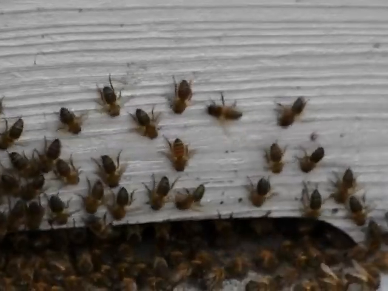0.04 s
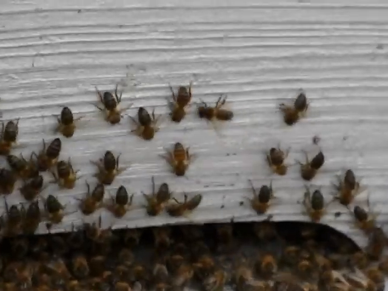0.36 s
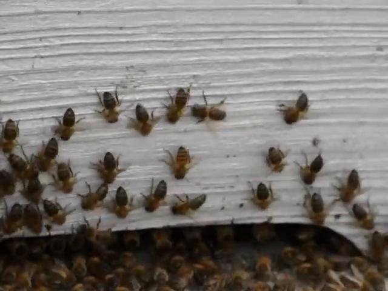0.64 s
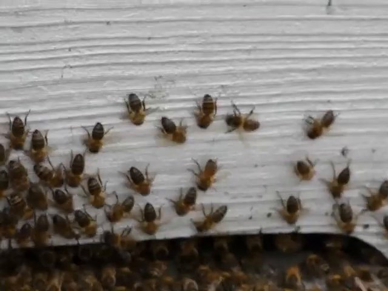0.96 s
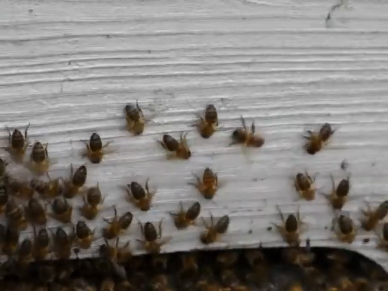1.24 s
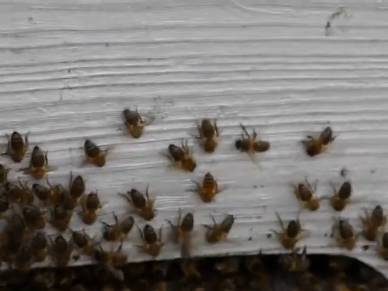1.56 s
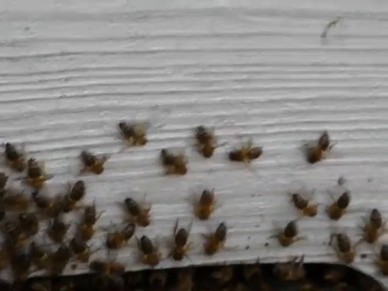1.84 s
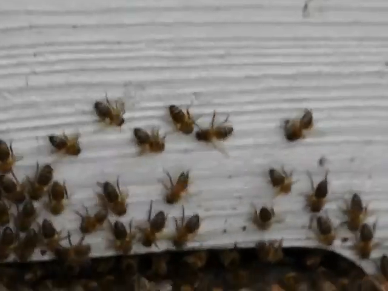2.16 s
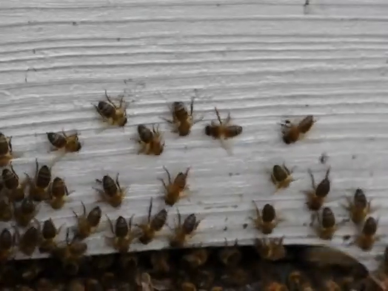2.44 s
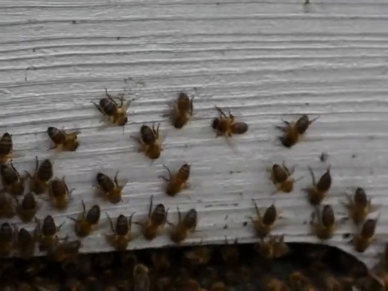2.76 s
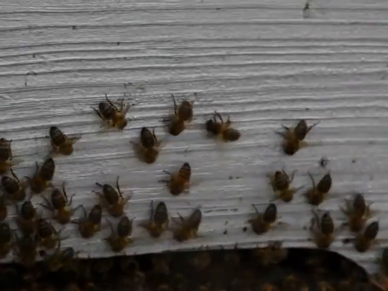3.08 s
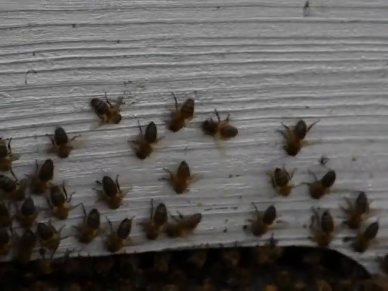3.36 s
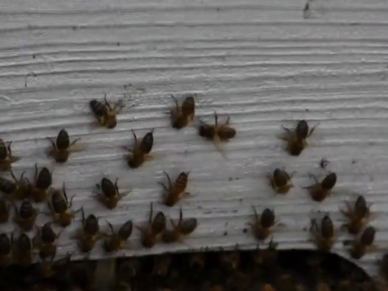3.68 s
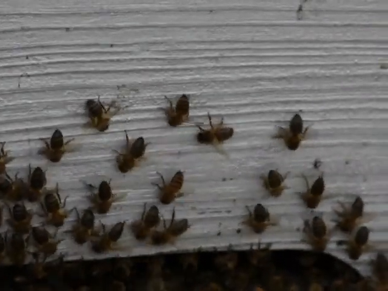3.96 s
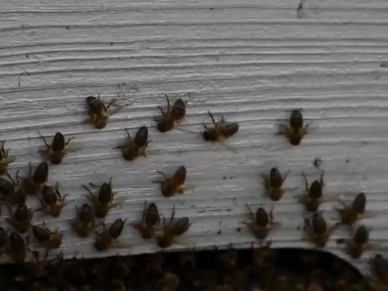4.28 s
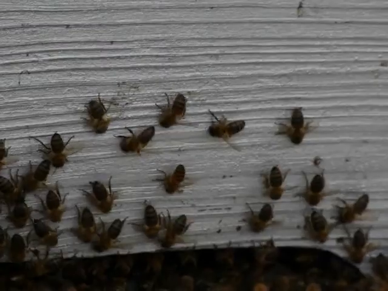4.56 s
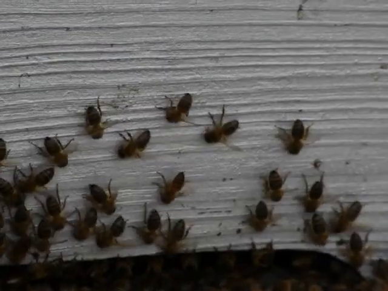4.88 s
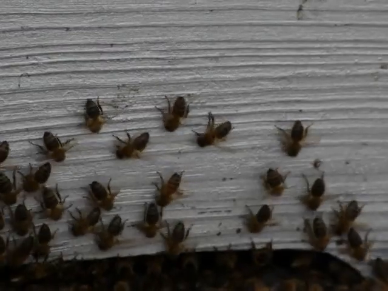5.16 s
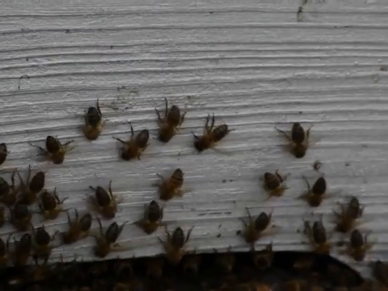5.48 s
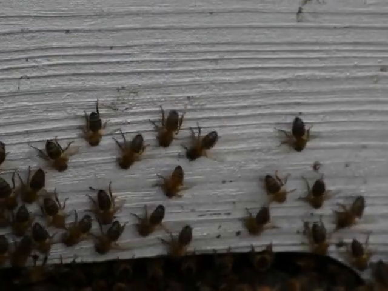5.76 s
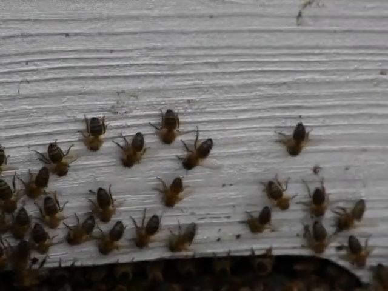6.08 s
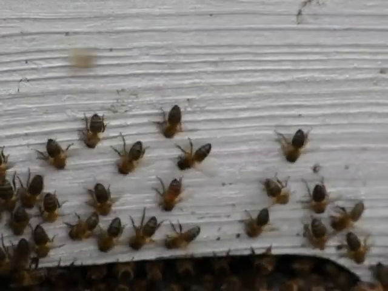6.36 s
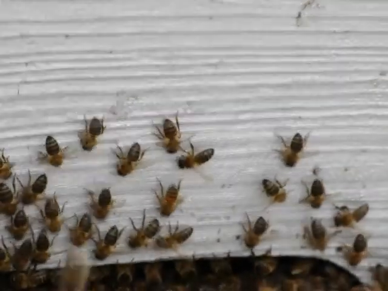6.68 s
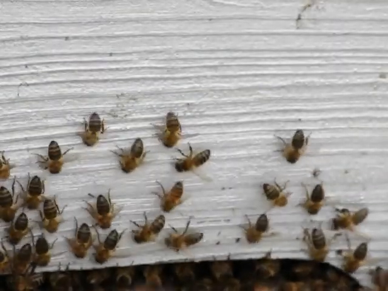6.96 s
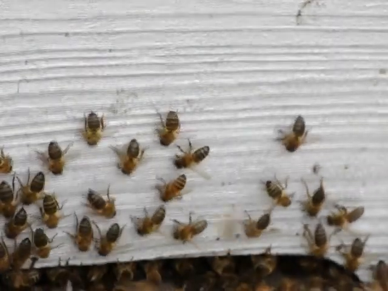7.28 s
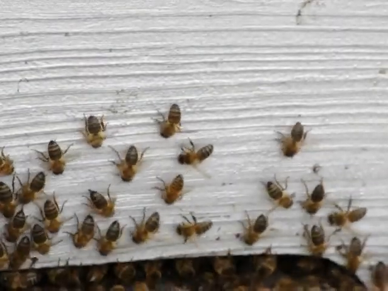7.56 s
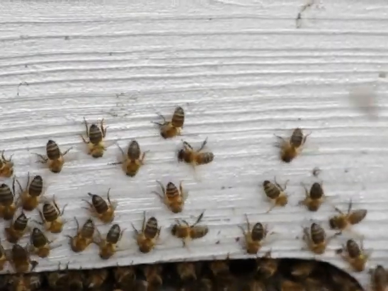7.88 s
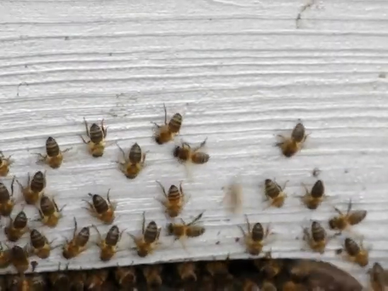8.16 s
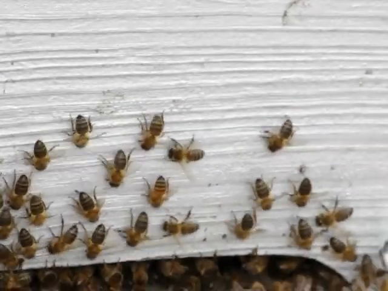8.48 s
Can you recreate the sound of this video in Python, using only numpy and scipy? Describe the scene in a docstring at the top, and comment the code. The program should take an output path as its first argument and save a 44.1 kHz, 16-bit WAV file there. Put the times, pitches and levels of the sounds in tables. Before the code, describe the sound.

Gusts thump and rumble on the microphone beside a beehive, then ease, leaving softly rustling leaves and a faraway whistling bird.

```python
"""Gusts buffet the microphone with low, fluttering thumps, outdoors at the entrance of a beehive.
Behind them a breeze swells in nearby leaves and dies away over the soft rush of wind in far trees.
A distant bird repeats a two-voiced rising whistle about every two seconds.
The wings of the colony hum very faintly inside the box."""
import sys
import numpy as np
from scipy import signal
from scipy.fft import rfft, irfft
from scipy.io import wavfile

SR = 44100
rng = np.random.default_rng(int(sys.argv[2]) if len(sys.argv) > 2 else 0)


def dump(signal):
    """Clip the signal to [-1, 1] and save it as 16-bit WAV at the path in sys.argv[1]."""
    limited = np.clip(np.atleast_2d(signal).T, -1, 1)
    pcm = np.round(limited * 32767).astype(np.int16)
    wavfile.write(sys.argv[1], SR, pcm)


N = 380583


def from_db(db):
    """Decibels to gain."""
    return 10 ** (np.asarray(db) / 20)


def rms_one(x):
    """Scale to unit rms."""
    return x / np.sqrt(np.mean(x ** 2) + 1e-20)


def in_time(rows):
    """The columns of a curve table, at every sample."""
    times, *columns = np.transpose(rows)
    return [np.interp(np.arange(N) / SR, times, column) for column in columns]


def drift(rate_hz):
    """Smooth random wandering, mostly slower than rate_hz; rms 1."""
    hz = np.arange(N // 2 + 1) * SR / N
    return rms_one(irfft(rfft(rng.standard_normal(N)) / (1 + (hz / rate_hz) ** 2), N))


def coloured(x, colour):
    """Filter a sound by a table of frequency_hz, gain_db; rms 1."""
    hz = np.maximum(np.arange(N // 2 + 1) * SR / N, 1)
    points_hz, db = np.transpose(colour)
    gain = from_db(np.interp(np.log(hz), np.log(points_hz), db))
    return rms_one(irfft(rfft(x) * gain, N))


def band(x, kind, edges_hz, order):
    """A Butterworth filter."""
    return signal.sosfilt(signal.butter(order, edges_hz, kind, fs=SR, output="sos"), x)


def add(out, sound, start_s):
    """Mix a short sound in at a given time."""
    at = round(start_s * SR) + np.arange(len(sound))
    inside = (at >= 0) & (at < N)
    out[at[inside]] += sound[inside]


def hive(wingbeat_hz=172.4, level_db=-78, waver=0.01165, swell_db=3):
    """A faint, wavering hum of wings from inside the box."""
    pitch_hz = wingbeat_hz * (1 + waver * drift(2.47))
    hum = np.sin(2 * np.pi * np.cumsum(pitch_hz) / SR)
    return from_db(level_db) * rms_one(hum * from_db(swell_db * drift(1.8)))


def distant_rush(rush_db, gain_db=5.0):
    """Wind in far trees, smooth and dulled by distance."""
    # spectrum of the far trees: frequency_hz, gain_db
    rush_colour = [(25, -24), (50, -27), (90, -8.5), (130, -7.5), (200, 0), (300, 2.5), (470, 1), (700, 0),
                   (1000, -1.5), (1500, -5), (2200, -6.5), (3200, -9.5), (6000, -16.5), (15000, -25.5)]
    return from_db(rush_db + gain_db) * coloured(rng.standard_normal(N), rush_colour)


def leaves(leaf_db, peak_touches_per_s=14000, spread_db=0.5, gain_db=5.0):
    """Thousands of tiny leaf contacts a second blur into a hiss; more touch as the breeze rises."""
    # spectrum of the nearby leaves: frequency_hz, gain_db
    leaf_colour = [(500, -4), (1200, 5), (2200, 3.5), (3800, 4), (5300, 6.5), (6500, 4), (8200, 0.5),
                   (10500, -0.5), (12500, -0.5), (14400, 2.5), (16000, -1.5)]
    touches_per_s = peak_touches_per_s * from_db((leaf_db - leaf_db.max()) / 2)
    touching = rng.random(N) < touches_per_s / SR
    grains = touching * rng.standard_normal(N) * from_db(spread_db * rng.standard_normal(N))
    hiss = rms_one(grains) + 2 * rng.standard_normal(N)   # single leaves close by, a smooth mass behind
    return from_db(leaf_db + gain_db) * coloured(hiss, leaf_colour)


def whistle(voice, waver, flutter_db=2):
    """One side of the syrinx sings a rising note whose pitch and level tremble."""
    times, hz, db = np.transpose(voice)
    t = np.arange(int(0.6 * SR)) / SR
    pitch_hz = np.interp(t, times, hz) * (1 + waver * drift(160)[:len(t)])
    level = from_db(np.interp(t, times, db) + flutter_db * drift(30)[:len(t)])
    gate = np.clip(np.minimum(t - times[0], times[-1] - t) / 0.0064, 0, 1)
    return gate * level * np.sin(2 * np.pi * np.cumsum(pitch_hz) / SR)


def far_bird(direct_db=-1.5, echo_s=0.034, echo_db=-11.0, scatter_db=-4.0, scatter_t60_s=0.36):
    """Two overlapping upward sweeps, the upper one husky; an echo doubles them, foliage smears them."""
    # the calls: start_s, upper_voice_db, lower_voice_db, lower_voice_lag_s
    calls = [(-.305, -66, -61, 0.11), (1.832, -60, -57.5, 0.11), (3.985, -63, -56.5, 0.12),
             (6.15, -61.5, -55.5, .118), (8.273, -60.5, -57, 0.092)]
    # the two sides of the syrinx: time_in_note_s, pitch_hz, gain_db
    upper_voice = [(0, 3440, -3), (.04, 3820, 0.5), (.08, 4220, 0), (.125, 4720, 0), (.195, 5250, -3),
                   (.255, 5150, -12)]
    lower_voice = [(0, 2370, -9), (.05, 2517, -5), (.13, 2677, -3.5), (.23, 2900, 0.5), (.31, 3232, 1),
                   (.36, 3446, -0.5), (.405, 3730, -7.5)]
    song = np.zeros(N)
    for start_s, upper_db, lower_db, lag_s in calls:
        add(song, from_db(upper_db) * whistle(upper_voice, waver=0.0217), start_s)
        add(song, from_db(lower_db) * whistle(lower_voice, waver=0.0093), start_s + lag_s)
    t = np.arange(SR // 2) / SR
    foliage = rng.standard_normal(len(t)) * from_db(-60 * t / scatter_t60_s)
    scattered = signal.fftconvolve(song, foliage / np.linalg.norm(foliage))[:N]
    heard = from_db(direct_db) * song + from_db(scatter_db) * scattered
    add(heard, from_db(echo_db) * song, echo_s)
    return heard


def airflow(attack_s=0.0058, release_s=0.02, still_air_db=-79):
    """Each gust arrives quickly, slackens or builds as it blows, then drops back to still air."""
    # gusts over the microphone: start_s, length_s, strength_db, loss_db (negative where it builds)
    gusts = [(0.0, 0.38, -51, -2), (0.49, 0.079, -53, -13), (.55, 0.19, -39, -6), (.73, 0.054, -28.5, 7),
             (0.818, .24, -28, 3), (1.092, .25, -36.5, -4), (1.34, 0.44, -37, 10.5), (1.913, 0.52, -43, 5),
             (2.502, .06, -40.5, -3), (2.74, 0.074, -46.5, -1.5), (3.528, .24, -55.5, 0.5),
             (3.798, 0.31, -60, -7.5), (4.183, 0.089, -45, 6), (4.372, 0.032, -45, 0),
             (4.458, 0.914, -49, -4.5), (5.412, 0.12, -50.5, -1), (5.796, 0.5, -69, 0)]
    t = np.arange(N) / SR
    flow = from_db(still_air_db)
    for start_s, length_s, strength_db, loss_db in gusts:
        age = t - start_s
        gate = np.clip(age / attack_s, 0, 1) * np.exp(-np.maximum(age - length_s, 0) / release_s)
        flow = flow + gate * from_db(strength_db - loss_db * np.clip(age / length_s, 0, 1))
    return flow


def buffeting(gain_db=-3.5, lumpy_db=10.0, flutter_db=2.0, flow_ceiling_db=-33):
    """Small eddies at the microphone merge into a sputtering rumble that sinks away in calm air."""
    # spectrum of the rumble: frequency_hz, gain_db
    gust_colour = [(25, -28), (50, -4), (80, 0.5), (140, 5.5), (230, -1), (320, -7.5), (430, -14.5),
                   (700, -42)]
    flow = airflow()
    flow = flow / np.hypot(1, flow / from_db(flow_ceiling_db))   # in strong gusts big eddies take over
    sputter = from_db(lumpy_db * np.tanh(drift(44)) + flutter_db * np.tanh(drift(22)))
    return from_db(gain_db) * flow * coloured(sputter * rng.standard_normal(N), gust_colour)


def eddy_train(length_s, gap_s=0.0105, jitter=0.221, uneven_db=3.0, fade_db=5.5):
    """A puff is a forerunner, a main eddy and an uneven, fading wake: rows of delay_s, relative_db."""
    gaps, sizes = rng.uniform(-1, 1, (2, 15))
    delays = np.cumsum(gap_s * (1 + jitter * gaps))
    wake = [(delay_s, uneven_db * size - fade_db * delay_s / length_s)
            for delay_s, size in zip(delays, sizes) if delay_s < length_s]
    forerunner, main_eddy = (-0.008, -10.5), (0, 0)
    return [forerunner, main_eddy] + wake


def eddies(width_cycles=0.33, spread_octaves=0.11, gain_db=2.46,
           rasp_gain_db=3.5, rasp_s=0.0038, rasp_growth=2.4):
    """Each eddy pushes, then sucks at the microphone port; hard ones break on its edge with a rasp."""
    # hard puffs within the gusts: time_s, length_s, strength_db, pitch_hz, rasp_db
    puffs = [(0.126, .005, -34.5, 188, -68), (.168, .016, -28.5, 240, -49), (0.221, .014, -20, 229, -45),
             (0.247, .014, -32.5, 220, -66), (0.58, .014, -25, 234, -46.5), (0.644, .005, -15.5, 212, -31),
             (.667, .005, -17.5, 323, -38), (.679, .01, -23, 205, -59), (.739, .018, -27, 185, -62),
             (.833, .06, -22, 202, -53), (0.911, .028, -18.5, 232, -47), (.949, .005, -17, 207, -39),
             (0.967, .026, -20, 234, -40), (1.008, .055, -21.5, 238, -53), (1.104, .022, -19.5, 226, -44.5),
             (1.177, .005, -24.5, 200, -57), (1.205, .036, -18, 235, -35), (1.29, .036, -27.5, 190, -53),
             (1.571, .028, -32.5, 207, -62), (1.65, .005, -31, 195, -56), (2.023, .018, -30.5, 198, -66),
             (2.126, .018, -33.5, 240, -54), (2.199, .005, -34, 170, -64), (2.223, .005, -33.5, 222, -62),
             (2.528, .005, -21.5, 212, -64), (4.2, .005, -36, 138, -72), (4.278, .014, -35, 205, -72),
             (4.481, .008, -27, 241, -60), (4.508, .012, -32.5, 202, -68), (4.659, .005, -37, 168, -70),
             (4.687, .005, -33, 190, -66), (4.834, .005, -34, 223, -70), (5.009, .005, -37, 189, -63),
             (5.044, .005, -34.5, 182, -62), (5.13, .005, -38, 150, -72), (5.295, .018, -37, 158, -65)]
    # spectrum of an eddy breaking up: frequency_hz, gain_db
    rasp_colour = [(200, -10), (380, 6.5), (500, 11), (750, -1), (1200, -18), (1900, -31), (4000, -48),
                   (9000, -80)]
    thumps, breaking = np.zeros(N), np.zeros(N)
    t = np.arange(-SR // 50, SR // 50) / SR
    burst = np.exp(-(t / rasp_s) ** 2)
    for time_s, length_s, strength_db, pitch_hz, rasp_db in puffs:
        chance = rng.standard_normal((17, 2))   # a detune and a skew for each of up to 17 eddies
        for (delay_s, eddy_db), (detune, skew) in zip(eddy_train(length_s), chance):
            cycles = t * pitch_hz * 2 ** (spread_octaves * detune)
            swing = -np.sin(2 * np.pi * cycles + 1.18 * skew) / np.cosh(cycles / width_cycles)
            start_s = time_s + delay_s + t[0]
            add(thumps, from_db(gain_db + strength_db + eddy_db) * swing, start_s)
            add(breaking, from_db(rasp_gain_db + rasp_db + rasp_growth * eddy_db) * burst, start_s)
    return thumps + breaking * coloured(rng.standard_normal(N), rasp_colour)


def microphone_port(wind, low_cut_hz=70, octave_db=-1, octave_cut_hz=380, fizz_db=-41):
    """The vent leaks slow swings away; hard puffs bend the flow, adding an octave. A fizz rides on top."""
    # a thin, narrow fizz near 12 kHz that rises and falls with the wind thumps: low_hz, high_hz
    fizz_band_hz = (11500, 12600)
    swings = band(wind, "high", low_cut_hz, order=3)
    octave = from_db(octave_db) * band(swings ** 2, "high", octave_cut_hz, order=4)
    hiss = rms_one(band(rng.standard_normal(N), "band", fizz_band_hz, order=3))
    fizz = from_db(fizz_db) * np.abs(swings) * hiss
    return swings + octave + fizz


def scene():
    """One microphone at the hive entrance hears everything; both channels carry it."""
    # the breeze in the trees: time_s, distant_rush_db, nearby_leaves_db
    breeze = [(0, -60.5, -62), (0.8, -59.5, -61.5), (1.6, -59, -58.8), (2.1, -59.5, -57.6),
              (2.8, -60.5, -58.0), (3.8, -60.5, -60), (4.8, -61, -62.5), (5.8, -61, -65), (7, -61.4, -66),
              (8.63, -60.5, -67)]
    rush_db, leaf_db = in_time(breeze)
    wind = microphone_port(eddies() + buffeting())
    air = wind + distant_rush(rush_db) + leaves(leaf_db) + far_bird() + hive()
    return np.stack([air, air])


def record(dry, cutoff_hz=15750, slope_width_hz=100):
    """The highest treble is cut steeply."""
    hz = np.arange(N // 2 + 1) * SR / N
    passband = np.clip((cutoff_hz - hz) / slope_width_hz + 0.5, 0, 1)
    return irfft(rfft(dry) * passband, N)


dry = scene()
out = record(dry)
dump(out)
```